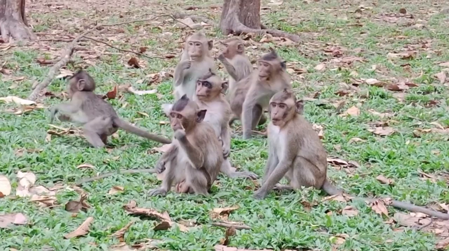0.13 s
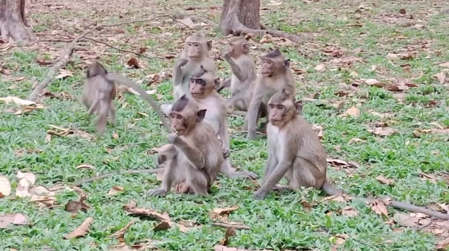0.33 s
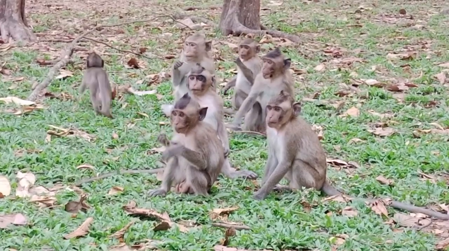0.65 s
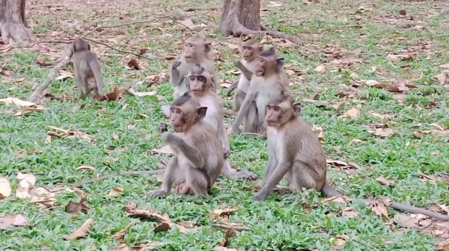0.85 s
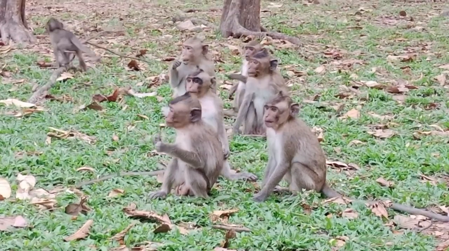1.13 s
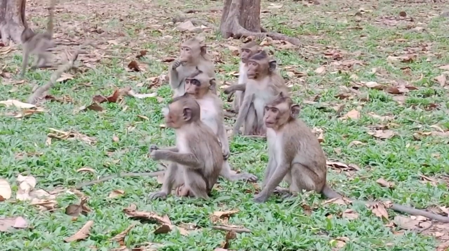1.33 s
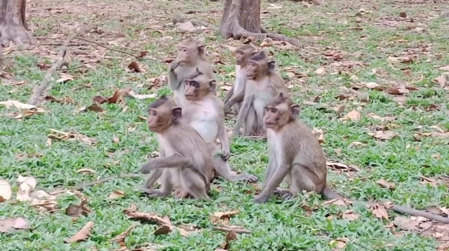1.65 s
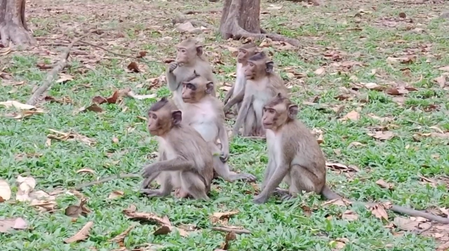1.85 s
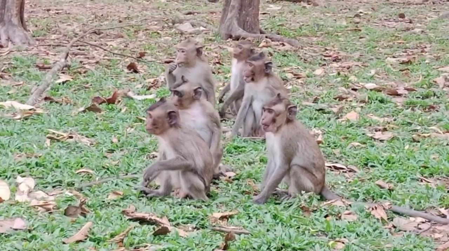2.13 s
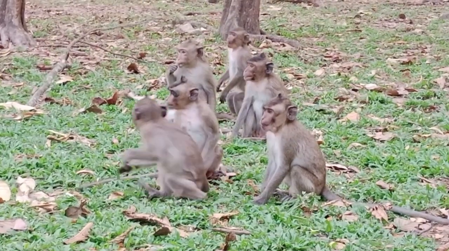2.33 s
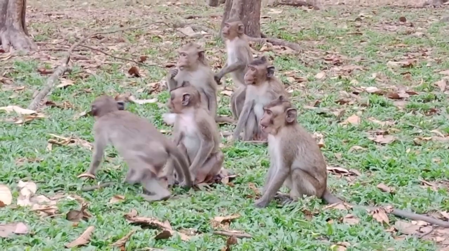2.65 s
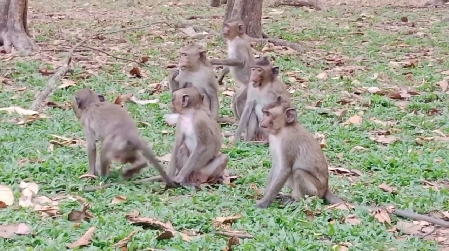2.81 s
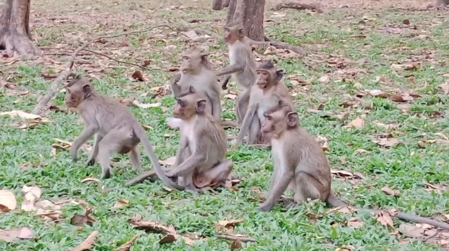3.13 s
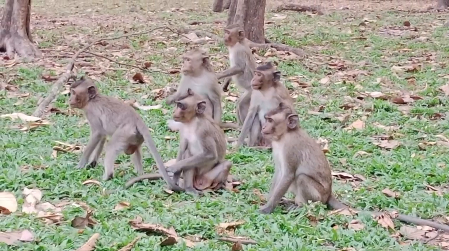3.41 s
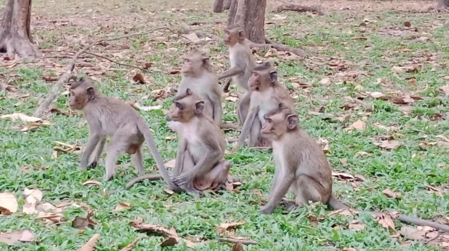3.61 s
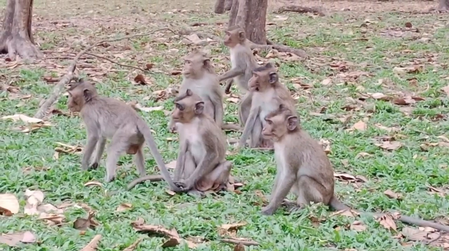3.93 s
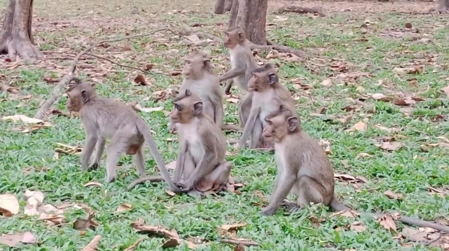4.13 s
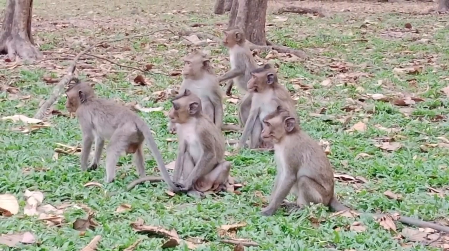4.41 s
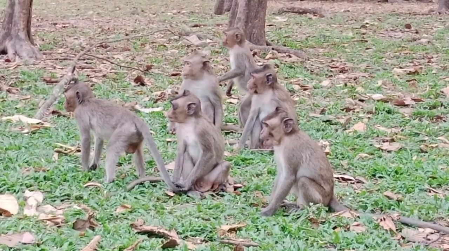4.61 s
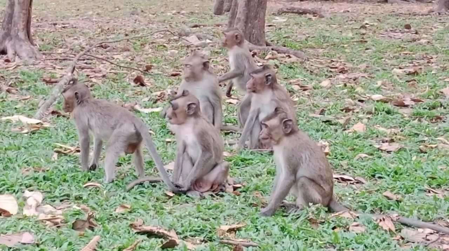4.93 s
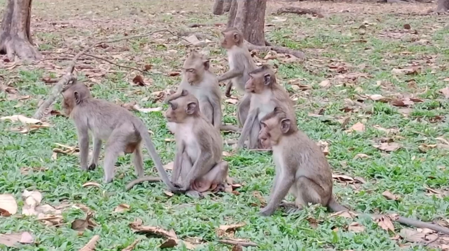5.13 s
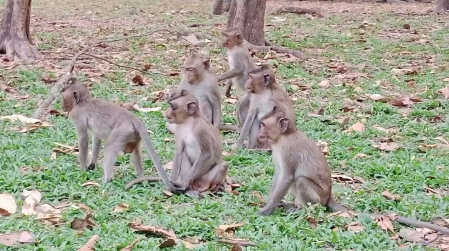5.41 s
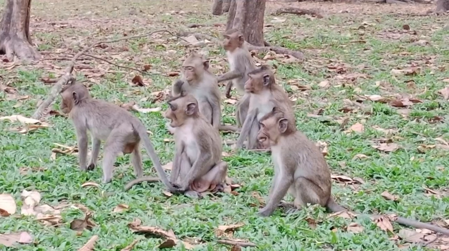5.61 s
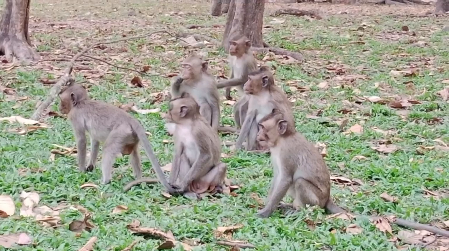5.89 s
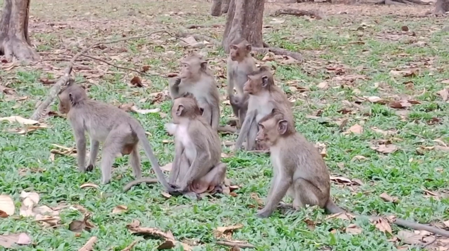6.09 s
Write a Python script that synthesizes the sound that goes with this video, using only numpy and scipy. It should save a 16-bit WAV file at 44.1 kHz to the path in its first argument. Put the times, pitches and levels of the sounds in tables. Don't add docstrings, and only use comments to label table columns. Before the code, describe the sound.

A monkey a short way off lets out a faint squeaky yelp running straight into a loud, hoarse rising bark, then after a pause a second similar bark. Each rings back from the trunks as a scattered tail. Behind them lie quiet insect hiss and trills, distant bird whistles and hoots, ticking dry leaves and low wind rumble on a small, dull-topped microphone.

```python
import sys
import numpy as np
from scipy import signal
from scipy.io import wavfile
from scipy.ndimage import uniform_filter1d

SR = 44100
rng = np.random.default_rng(int(sys.argv[2]) if len(sys.argv) > 2 else 0)


def undo_db(level):
    steps = np.asarray(level, float) / 20
    return 10 ** steps


def pcm_store(signal):
    levels = np.round(np.clip(np.atleast_2d(signal), -1, 1) * 32767)
    wavfile.write(sys.argv[1], SR, levels.astype(np.int16).T)


N = 276066

# frequency in Hz, gain in dB.
PORT_RESPONSE = [(30, -32), (300, 1), (3500, -0.5), (4200, -10.5), (4650, -41), (4850, -46), (5200, -16),
                 (6200, -7.5), (7400, -2.5), (8300, -10), (8900, -31.5), (9500, -44), (11000, -25),
                 (12500, -43)]


def monkey():
    # time in seconds, pitch in Hz.
    pitches = [
        [(1.12, 690), (1.145, 690), (1.158, 622), (1.181, 705), (1.205, 722), (1.235, 710)],
        [(1.24, 470), (1.25, 498), (1.27, 583), (1.289, 658), (1.312, 685), (1.335, 670)],
        [(2.962, 392), (2.976, 420), (2.988, 520), (3.011, 582), (3.021, 630), (3.032, 649), (3.066, 652)],
    ]
    # frequency in Hz, share at the break pitch in dB,
    # growth with pitch in dB per Hz.
    seconds_up = [(1930, -14, -.15), (1750, -1, .5), (1670, 2, .45)]
    # first frequency in Hz, last frequency in Hz.
    sac_glides = [(700, 690), (780, 990), (825, 890)]
    breaths = [(.2, .15), (.03, .7), (.07, .2)]
    # time in seconds, effort in dB,
    # mouth opening as a factor on the throat resonances.
    efforts = [
        [(1.12, -67, 0.95), (1.145, -70.5, 1), (1.158, -67, 0.83), (1.172, -68.5, 0.96), (1.181, -49, 0.99),
         (1.205, -63, 0.98), (1.235, -72.5, 0.96)],
        [(1.24, -70, 1.3), (1.255, -41.5, 0.99), (1.268, -34.5, 0.86), (1.279, -26, 0.95), (1.29, -27, 0.99),
         (1.304, -26, 1.058), (1.318, -33.5, 1.1), (1.335, -46.5, 0.95)],
        [(2.962, -72, .9), (2.978, -43.5, 0.9), (2.993, -37.5, 0.93), (3.01, -28, 0.93), (3.02, -28.5, 1),
         (3.035, -26.5, 0.94), (3.05, -29, 0.98), (3.066, -54, 0.97)],
    ]
    # frequency in Hz, width in Hz, level in dB.
    throats = [
        [(1400, 320, -1), (2050, 260, 4.5), (7300, 1500, -44.5)],
        [(1306, 290, -15.5), (1906, 530, 2.5), (2400, 410, -3), (2880, 700, -16), (3700, 1900, -28),
         (6976, 1200, -18.5), (12055, 3200, -22.5)],
        [(1361, 150, -5.5), (1760, 480, 3.5), (2160, 300, -11), (2630, 500, 5.5), (3250, 390, -3.5),
         (3620, 370, -13), (6420, 1900, -13.5), (7520, 1200, -8), (11760, 6100, -18)],
    ]
    # coupling of the oscillators 0-1, treble tilt in dB per octave,
    # air sac level in dB.
    voices = [(0.39, -1.5, -24), (0.4, -4.5, -26), (0.8, 1.5, -23)]
    # tail level in dB, factor on the decay times, exponent by which
    # treble rings longer, chest sound sent away from the microphone in dB, far clump of trees in dB.
    places = [(-7.5, 1.9, -0.006, 5, 4), (-5.5, 0.87, .3, 2, 3), (-7, 0.92, -.1, -1, 5.5)]
    out = np.zeros(N)
    calls = zip(pitches, seconds_up, sac_glides, breaths, efforts, throats, voices, places)
    for pitch, second, sac, breath, effort, throat, voice, place in calls:
        start = pitch[0][0]
        mouth, chest = call(larynx(pitch, second, sac, breath), effort, throat, *voice)
        add(out, start, mouth)
        add(out, start, grove(mouth, chest, *place))
    return out


def larynx(pitch, second, sac, breath):
    hz = columns(pitch)[0]
    u = np.linspace(0, 1, len(hz))
    second_hz, share_db, growth = second
    second_db = np.clip(share_db + growth * (hz - 650), -40, 2)
    sac_hz = sac[0] + (sac[1] - sac[0]) * u
    breath_share = breath[0] + (breath[1] - breath[0]) * u ** 2.3
    return hz, second_hz + 0 * u, second_db, sac_hz, breath_share


def call(controls, effort, throat, coupling, tilt_db, sac_db):
    hz, second_hz, second_db, sac_hz, breath = controls
    effort_db, mouth = (np.resize(c, len(hz)) for c in columns(effort))
    shake = []
    for _ in range(3):
        wobble = evened(uniform_filter1d(rng.standard_normal(len(hz)), size=70))
        shake.append(1 + (.016 + .08 * breath) * wobble)
    folds = buzz(hz * shake[0], tilt_db + 0.16 * (effort_db + 27.0), count=8)
    second = undo_db(second_db) * buzz(second_hz * shake[1], -5.5, count=2)
    sac = buzz(sac_hz * shake[2], -20, count=1)
    drive = folds + second + coupling * folds * (second + breath * sac)
    puffs = (0.2 + 3.0 * breath) * (0.4 + abs(folds)) * rng.standard_normal(len(hz))
    drive = drive * shake[2] ** 6 + puffs
    voice = sum(undo_db(db) * steep(drive, f * mouth, width) for f, width, db in throat)
    voice = signal.sosfilt(signal.butter(6, 820, "high", fs=SR, output="sos"), voice)
    voice = voice / np.sqrt(uniform_filter1d(voice ** 2, size=600) + 1e-9)
    voice = voice + undo_db(sac_db - 0.35 * (effort_db + 29.5)) * sac
    shape = undo_db(effort_db) * signal.windows.tukey(len(hz), .08)
    return shape * voice, shape * evened(steep(drive, hz, 370))


def buzz(hz, tilt_db, count):
    phase = 2 * np.pi * np.cumsum(hz) / SR
    harmonics = range(1, count + 1)
    return evened(sum(undo_db(tilt_db * np.log2(k)) * np.cos(k * phase + 0.39 * k * k) for k in harmonics))


def grove(mouth, chest, tail_db, longer, treble, chest_db, far_db):
    # frequency in Hz, time to fall 60 dB in seconds.
    decays = [(600, .55), (880, 1.2), (1300, 1.1), (1700, 1.16), (2700, 0.75), (4000, 0.93), (7500, 0.67)]
    # frequency in Hz, gain in dB.
    colour = [(400, -22), (620, 3), (900, 6), (1300, 6), (1800, -5.5), (3000, -1.5), (4200, 3.5),
              (5500, -0.5), (7000, 3.5)]
    # delay in seconds, level in dB.
    echoes = [(.004, -8), (.009, -14), (.016, -6.5), (.036, -14), (.055, -11), (.078, -26), (.11, -20.5)]
    decays = [(f, longer * t60 * (f / 1700) ** treble) for f, t60 in decays]
    response = tail(decays, seconds=1.5, patch_db=3.0)
    response = response * trees(len(response), far_db)
    for s, db in echoes:
        response[round(s * SR)] += undo_db(db)
    late = round(0.04 * SR)
    sent = np.pad(mouth, (0, late)) + undo_db(chest_db - 25) * np.pad(chest, (late, 0))
    return undo_db(tail_db) * coloured(signal.fftconvolve(sent, response), colour)


def trees(count, far_db):
    t = np.arange(count) / SR
    clump_s = 2 * .045
    clumps_db = 3.5 * bump(t, 0.037, clump_s) + far_db * bump(t, 0.415, clump_s)
    filling_db = -24 * np.exp(-t / .009)
    return undo_db(filling_db + clumps_db - 8 * np.minimum(t, .7))


def tail(decays, seconds, patch_db):
    hz, t, z = signal.stft(rng.standard_normal(round(seconds * SR)), SR, nperseg=256)
    patches = evened(uniform_filter1d(uniform_filter1d(rng.standard_normal(z.shape), 4, 0), 16, 1))
    fall_db = 60 * t / read(decays, hz)[:, None]
    out = signal.istft(z * undo_db(patch_db * patches - fall_db), SR, nperseg=256)[1]
    return out / np.linalg.norm(out)


def leaves():
    # start in seconds, peak in dB, thin treble in dB, treble ring in Hz,
    # dull knock in dB.
    ticks = [(0.2933, -67, -88, 14800, -67.5), (0.9342, -55.5, -91.5, 15440, -80),
             (1.756, -77, -93, 12100, -72), (2.1875, -68, -85, 13100, -85), (2.2644, -70, -86, 10800, -66),
             (2.654, -74, -97, 11200, -89), (3.27, -51, -91.5, 10660, -61), (4.059, -77, -93, 12400, -79),
             (4.3932, -61.5, -92, 14900, -89), (4.9504, -57, -71.5, 15270, -84),
             (5.2687, -65, -95, 10800, -71.5), (5.3985, -64, -73, 15130, -73),
             (5.4836, -61, -91, 13550, -93)]
    out, t = np.zeros(N), np.arange(round(.06 * SR)) / SR
    for s, db, thin_db, thin_hz, knock_db in ticks:
        burst = rng.standard_normal(len(t)) * (undo_db(-60 * t / 0.0041) + undo_db(-16 - 60 * t / 0.17))
        crack = coloured(steep(burst, 7580, 1500), PORT_RESPONSE)
        ring = steep(burst, thin_hz, 900) + 0.14 * steep(burst, 12500, 4400)
        knock = steep(burst, 2500, 1630)
        for level_db, part in ((db - 1, crack), (thin_db + 7, ring), (knock_db + 3, knock)):
            add(out, s, undo_db(level_db) * part / abs(part).max())
    return out


def insects():
    # time in seconds, level in dB.
    effort = [(0.0, -77), (.35, -81.5), (.94, -76.5), (1.44, -69), (2.0, -76), (2.84, -80.5), (3.05, -73),
              (3.26, -67), (3.5, -74.5), (4.05, -84), (4.55, -79.5), (4.75, -86), (5.54, -77.5),
              (5.98, -88), (6.26, -89)]
    # frequency in Hz, width in Hz, level in dB.
    bands = [(6608, 400, -5), (6940, 550, 2.5), (7525, 800, 1), (7830, 350, -3), (8270, 1000, -2)]
    # centre in seconds, peak in dB, length in seconds.
    bursts = [
        (1.332, -104, .12),
        (2.29, -98, .09),
        (3.03, -89, .1),
        (3.59, -92, 0.042),
        (4.82, -96, 0.21),
        (5.45, -94, 0.22),
        (5.754, -92, .1),
        (6.12, -96.5, .15),
    ]
    noise = patchy(4.7, frames=20, bins=4)
    chorus = sum(undo_db(db) * evened(steep(noise, f, width)) for f, width, db in bands)
    chorus = undo_db(np.resize(columns(effort)[0], N)) * evened(coloured(chorus, PORT_RESPONSE))
    thin = swells(-103, bursts) * evened(steep(noise, 11000, 650))
    return chorus + thin + trilling_insect()


def trilling_insect():
    # start in seconds, level in dB, first frequency in Hz.
    trills = [
        (0.676, -73.5, 5270),
        (1.586, -75.5, 5200),
        (2.52, -82, 5050),
        (3.46, -79.5, 5094),
        (4.491, -79.5, 5130),
        (5.508, -77, 5245),
    ]
    out, t = np.zeros(N), np.arange(round(.06 * SR)) / SR
    for s, db, hz in trills:
        for step, (late, sharp, size) in enumerate(rng.standard_normal((7, 3))):
            step_hz = hz + 270 * step + 90 * sharp
            ring = np.sin(2 * np.pi * step_hz * t * (1 + .4 * t))
            ring = ring * undo_db(1.8 * size - 2.2 * abs(step - 3.6) - 60 * t / 0.07)
            add(out, s + .012 * step + 0.0014 * late, undo_db(db + 6) * ring * np.clip(t / 0.0084, 0, 1))
    scatter = tail([(5000, .6), (8000, 0.43)], seconds=0.65, patch_db=7)
    return out + undo_db(4.5) * signal.fftconvolve(out, scatter)[:N]


def far_notes():
    # start in seconds, length in seconds, first Hz, last Hz,
    # peak in dB.
    distant_notes = [(1.984, .08, 2330, 2160, -75.5), (2.042, .08, 2173, 2124, -64.5),
                     (2.285, 0.18, 2191, 2190, -66), (2.445, 0.041, 2175, 2175, -69.5),
                     (2.5, .1, 2160, 2170, -83), (2.538, 0.088, 5590, 5450, -84), (2.427, .05, 6800, 7080, -72),
                     (2.457, 0.11, 7090, 7130, -67.5), (4.1, 0.069, 3400, 3510, -75.5),
                     (5.255, 0.085, 2400, 2270, -76.5), (5.259, 0.05, 3140, 3070, -79),
                     (5.262, .045, 4170, 4100, -85.5), (5.389, 0.094, 3635, 3670, -76),
                     (5.458, 0.098, 3594, 3640, -73.5), (5.531, .19, 3620, 3540, -79.5),
                     (5.46, 0.096, 13300, 13430, -96), (5.89, 0.12, 10030, 10100, -100),
                     (0.895, 0.22, 985, 987, -83), (3.365, 0.093, 594, 555, -74), (2.842, 0.055, 675, 700, -79),
             (2.897, 0.089, 710, 734, -79.5), (4.1, .06, 510, 510, -66), (5.042, 0.079, 1273, 1282, -79),
             (5.11, 0.12, 1714, 1758, -82.5), (5.293, 0.11, 1215, 1177, -73),
             (5.394, 0.15, 1211, 1225, -64), (5.518, 0.098, 1207, 1198, -67), (5.612, .05, 1220, 1220, -82),
             (5.669, 0.066, 1236, 1184, -78), (5.32, 0.087, 1834, 1790, -81.5),
             (5.46, 0.054, 1807, 1890, -74.5), (5.535, 0.088, 1838, 1810, -76),
             (6.183, 0.14, 1860, 1936, -81)]
    out = np.zeros(N)
    for s, length, first_hz, last_hz, db in distant_notes:
        u = np.arange(0, 1, 1 / (length * SR))
        hz = first_hz + (last_hz - first_hz) * u
        flutter = evened(resonate(rng.standard_normal(SR // 2)[:len(u)], hz, 39))
        note = np.sqrt(2) * np.sin(2 * np.pi * np.cumsum(hz) / SR) + 0.49 * flutter
        arch = np.sin(np.pi * u ** 0.72)
        add(out, s, undo_db(db - 17 * (1 - arch)) * note * signal.windows.tukey(len(u), .15))
    return out


def wind():
    # centre in seconds, peak in dB, length in seconds.
    gusts = [(0.136, -58, 0.12), (0.336, -58, 0.22), (0.634, -63.5, 0.072), (0.744, -63.5, 0.052),
             (0.935, -60.5, 0.081), (1.042, -68.5, 0.038), (1.294, -52.5, .08), (1.383, -57.5, .06),
             (1.557, -57, 0.11), (1.683, -53, .09), (2.085, -69.5, 0.16), (2.35, -70, 0.11),
             (2.499, -63, 0.048), (2.637, -69.5, 0.27), (3.05, -64, .12), (3.211, -61.5, .08),
             (3.4, -67.5, 0.064), (3.553, -71, .05), (3.662, -68.5, 0.038), (3.904, -69.5, 0.12),
             (4.178, -64, 0.051), (4.33, -62.5, 0.042), (4.741, -62.5, 0.034), (4.9, -71, 0.19),
             (5.091, -67.5, 0.093), (5.47, -67.5, 0.16), (6.028, -62, 0.029), (6.25, -70, .06)]
    # frequency in Hz, level in dB per Hz.
    rumble = [(30, -28), (60, -14), (95, -4), (120, -2), (145, -1), (175, -11), (230, -19.5), (400, -60)]
    # frequency in Hz, width in Hz, level in dB.
    hums = [(141.6, 14, -6.5), (110.4, 14, -9)]
    breeze_db = -69.5 - .5 * np.arange(N) / SR
    level = swells(breeze_db, gusts)
    push = patchy(2.0, bins=2)
    humming = sum(undo_db(db) * evened(steep(push, f, width)) for f, width, db in hums)
    return level * evened(evened(coloured(push, rumble)) + humming)


def open_air():
    # frequency in Hz, level in dB per Hz.
    murmur = [(150, -0.5), (250, -6), (360, -11.5), (550, -21), (1200, -20.5), (1900, -18), (2700, -29),
              (4000, -24.5), (7000, -27.5), (15000, -28)]
    lull_db = -3.1 * bump(np.arange(N) / SR, 5.73, 0.94)
    return undo_db(-68 + lull_db) * evened(coloured(patchy(2.6), murmur))


def circuit_hiss():
    # frequency in Hz, level in dB per Hz.
    spectrum = [(200, 4), (4000, 1), (9000, -9.5), (14000, -2), (15300, -5), (15600, -25)]
    return undo_db(-92.5) * evened(coloured(rng.standard_normal(N), spectrum))


def patchy(patch_db, frames=10, bins=6):
    a, b, patches = rng.standard_normal((N // 128 + 5, 257, 3)).T
    patches = evened(uniform_filter1d(uniform_filter1d(patches, bins, 0), frames, 1))
    z = (a + 1j * b) * undo_db(patch_db * patches)
    return evened(signal.istft(z, nperseg=512, noverlap=384)[1][:N])


def coloured(x, points):
    log_gain = read(points, abs(np.fft.fftfreq(8192, 1 / SR))) * np.log(10) / 20
    taps = np.fft.ifft(np.exp(np.conj(signal.hilbert(log_gain)))).real[:4096]
    return signal.oaconvolve(x, taps)[:len(x)]


def resonate(x, hz, width):
    turn = np.exp(2j * np.pi * np.cumsum(hz * np.ones(len(x))) / SR)
    r = np.exp(-np.pi * width / SR)
    return 2 * (turn * signal.lfilter([1 - r], [1, -r], x / turn + 1e-18)).real


def steep(x, hz, width):
    return resonate(resonate(x, hz, width), hz, width)


def bump(t, s, length):
    return np.exp(-(2 * (t - s) / length) ** 2)


def swells(base_db, rows):
    t = np.arange(N) / SR
    power = sum((undo_db(db) * bump(t, s, length)) ** 2 for s, db, length in rows)
    return np.sqrt(undo_db(base_db) ** 2 + power)


def columns(rows):
    s, *rest = np.transpose(rows)
    t = np.arange(s[0], s[-1], 1 / SR)
    return [np.interp(t, s, c) for c in rest]


def read(points, hz):
    f, value = np.transpose(points)
    return np.interp(np.log(hz + 1), np.log(f + 1), value)


def evened(x):
    return x / np.sqrt(np.mean(x ** 2) + 1e-20)


def add(mix, s, sound):
    part = mix[round(s * SR):][:len(sound)]
    part += sound[:len(part)]


def scene():
    through_port = coloured(monkey() + open_air(), PORT_RESPONSE)
    return (through_port + leaves() + insects() + far_notes() + wind())[None]


def top_cut(x):
    return signal.sosfilt(signal.butter(12, 15500, fs=SR, output="sos"), x)


def record(dry):
    return top_cut(dry + circuit_hiss())


dry = scene()
out = record(dry)
pcm_store(out)
```